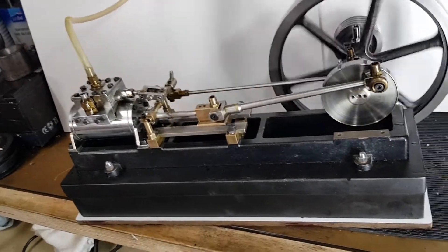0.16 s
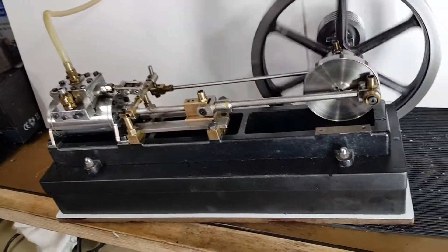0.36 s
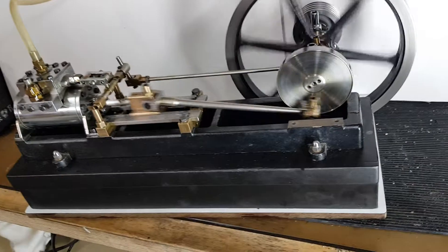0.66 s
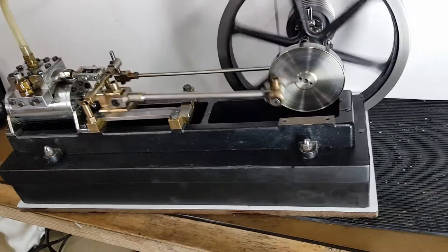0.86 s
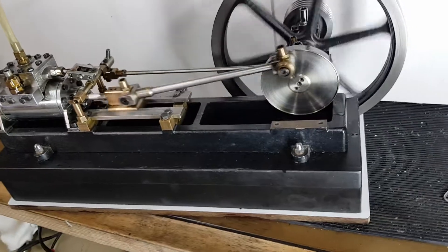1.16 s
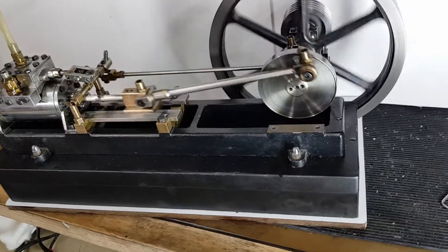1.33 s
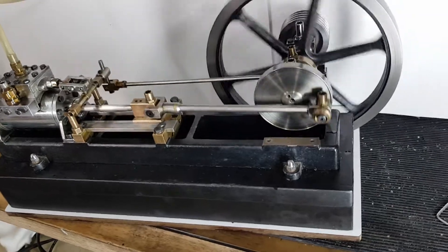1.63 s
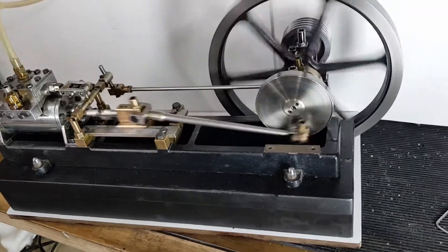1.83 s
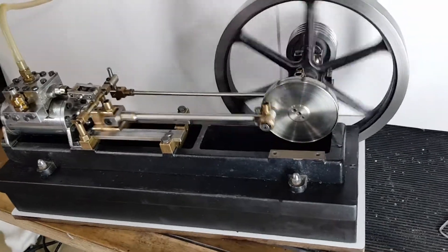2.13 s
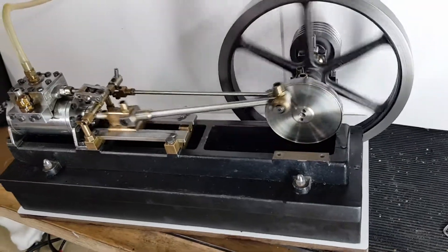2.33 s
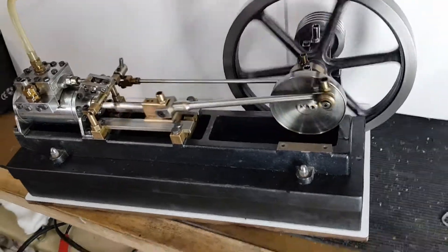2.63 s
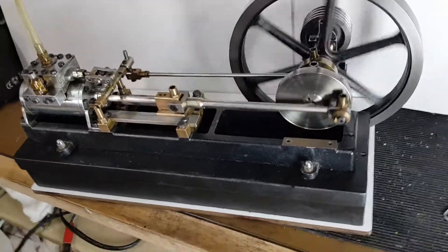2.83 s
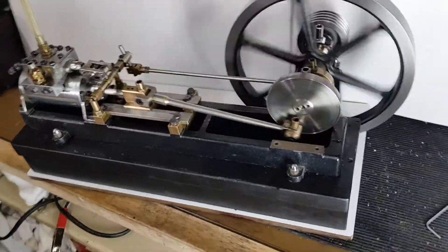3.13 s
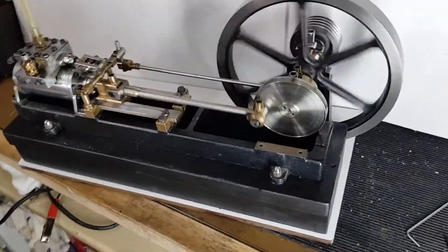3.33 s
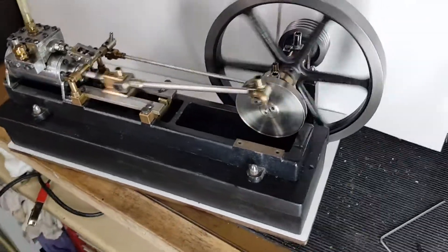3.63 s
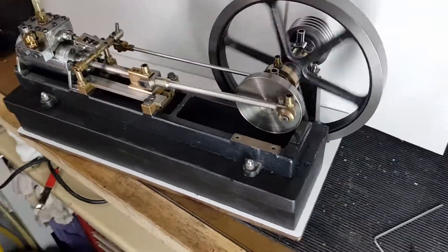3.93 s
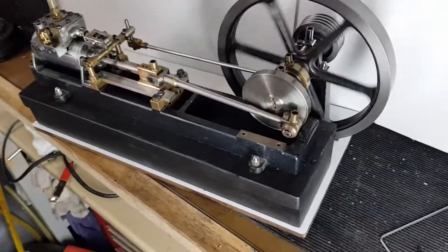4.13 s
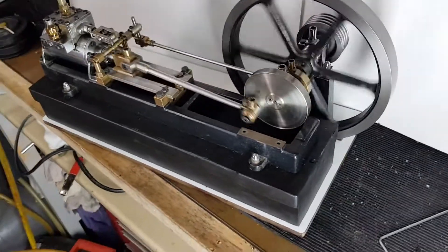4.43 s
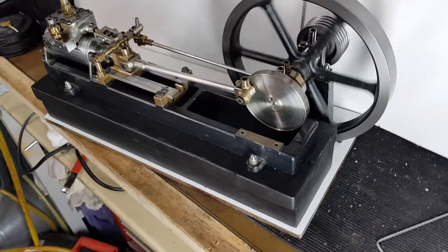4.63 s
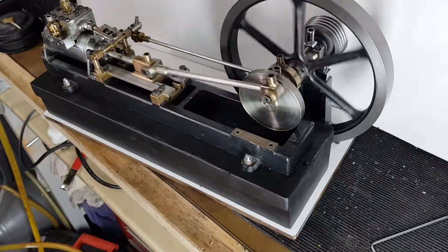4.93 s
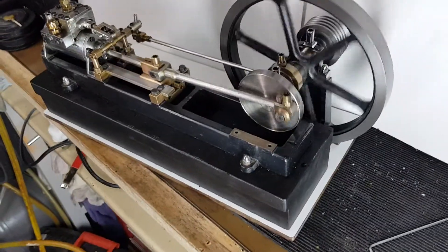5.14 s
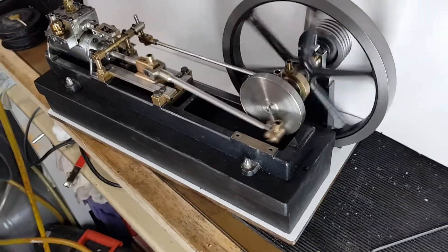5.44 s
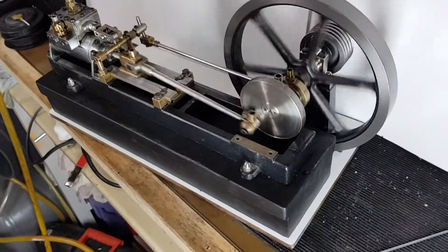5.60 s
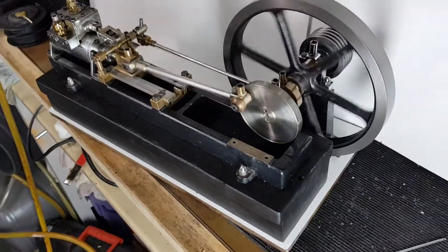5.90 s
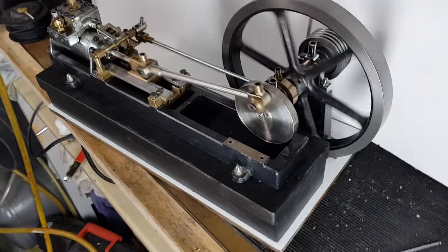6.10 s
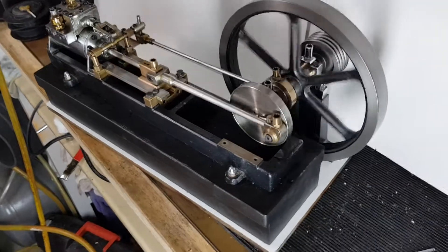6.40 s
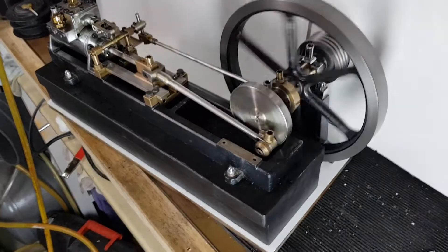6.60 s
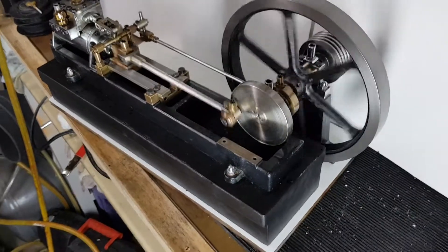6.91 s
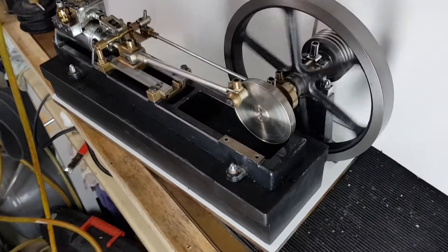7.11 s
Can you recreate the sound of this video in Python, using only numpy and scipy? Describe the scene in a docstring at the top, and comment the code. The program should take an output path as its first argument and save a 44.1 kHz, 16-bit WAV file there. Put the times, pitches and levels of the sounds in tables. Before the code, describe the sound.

Close bright air hiss swells over a slow, regular knocking of a little piston engine, with loud finger bumps on the right side of the microphone.

```python
"""On a wooden bench a model steam engine turns slowly, close to a hand-held microphone that moves round it.
Its valve chest leaks with a steady hiss, made of coloured noise that swells with every stroke.
On each stroke the valve spits, the piston whirrs (both narrow noise) and the rod knocks (falling sweeps and
ringing tones). A finger on the right microphone port adds noisy rubs, and pressure steps heard as pops and
thumps. Behind this the flywheel rumbles, the bench drones, and one soft scuff is heard on both sides."""
import sys
import numpy as np
from scipy import signal
from scipy.fft import rfft, irfft, next_fast_len
from scipy.io import wavfile

SR = 44100
rng = np.random.default_rng(int(sys.argv[2]) if len(sys.argv) > 2 else 0)


def master(y):
    """Save y as 16-bit WAV."""
    cut = np.clip(np.atleast_2d(y).T, -1, 1)
    pcm = np.round(cut * 32767)  # scale
    wavfile.write(sys.argv[1], SR, pcm.astype(np.int16))


N = 320166
TIME = np.arange(N) / SR  # seconds

# Colours of the three parts of the leak. Each row: frequency in Hz, level per hertz in dB.
JET_COLOUR = [(8500, -28), (10000, -8.5), (11000, -4), (12000, 1), (12900, 3), (14000, -6), (14500, 4),
              (15100, -8.5), (15700, -1.5)]
WHISTLE_COLOUR = [(1200, -31.5), (2700, -24.5), (3700, -18.5), (4300, -11), (5200, -6.5), (5600, -1),
                  (6100, -3.5), (6500, -4), (7000, -9.5), (8000, -24)]
SPRAY_COLOUR = [(5500, -41), (6700, -3.5), (7250, 5), (7700, -0.5), (8300, 2.5), (8750, 1), (9200, -1.5),
                (9800, -6), (11500, -25)]
# Mix of each part of the leak. In order: level in dB, share of the nearness swing (1 is all of it),
# swell within a stroke in dB, loss at a fully covered port in dB.
JET_MIX = (-43, 0.9, 5.5, 7)
WHISTLE_MIX = (-47.5, 0.86, 1.3, 6)
SPRAY_MIX = (-53, 0.9, 4.5, 18.5)
# Narrow resonances of the leaking gap. Each row: frequency in Hz, width in Hz, level in dB.
GAP_MODES = [(5690, 44, -13), (5880, 39, -14), (6008, 66, -7), (6090, 58, -16)]
# How strongly the gap's resonances are heard. Each row: time in seconds, level in dB.
GAP_RING = [(0, 3.5), (1, -0.5), (3.4, -2.5), (3.9, 5), (5.7, 1), (6.3, -7.5), (7.26, -10)]
# Balance of the whistle, which is beamed, so it shifts as the microphone moves.
# Each row: time in seconds, left minus right in dB.
WHISTLE_PAN = [(0, 3), (.85, -0.5), (4.3, 1), (4.65, 4.5), (5.5, 3), (6.35, -2.5), (7.26, 1)]
# How near the microphone is to the cylinder; leak, spits, whirr and drone follow it.
# Each row: time in seconds, level in dB.
NEARNESS = [(0, .5), (.65, -1.5), (1, -6.5), (2.9, -6), (3.2, -2.5), (3.8, 1), (5.35, -1), (5.7, .5),
            (6.15, 0), (6.3, -5.5), (7.26, -5.5)]
# Rod knocks at dead centre (either end of the stroke), outer and inner end in turn.
# Each row: start in seconds, level in dB.
KNOCKS = [(0.486, -44), (1.035, -47), (1.701, -53.5), (2.256, -46.5), (2.935, -50.5), (3.486, -40),
          (4.126, -40.5), (4.672, -41.5), (5.333, -45.5), (5.899, -45), (6.552, -47.5), (7.078, -47)]
# What a knock sets ringing in bed plate and bench; pitch and level vary a little from knock to knock.
# Each row: typical frequency in Hz, typical level in dB, time to fall by 60 dB in seconds.
KNOCK_MODES = [(63.3, -12.5, 0.12), (149, -5, 0.17), (248, -26, 0.069), (519.6, -7.5, 0.11),
               (697, -21, 0.071), (1310, -38, 0.099), (1653, -17, .06)]
# Grip of the hand beside the right port.
# Each row: time in seconds, share of the port covered from 0 to 1, rumble level in dB.
GRIP = [(0, 0.74, -44), (.6, 0.9, -44), (.8, 0.55, -54.5), (1.35, 0.9, -50), (2.95, 0.84, -46.5),
        (3.3, 0.04, -58.5), (4.5, 0, -56.5), (5.55, .1, -72), (5.77, 0, -45), (5.85, 0.76, -43),
        (6.15, 0.55, -37), (6.3, 0, -69), (7.26, 0.04, -64)]
# Finger pressure steps on the right port. Each row: middle in seconds, level in dB, rise in ms.
THUMPS = [(0.6927, 5.5, 0.46), (0.7103, -2.5, 0.37), (1.293, -26, 0.87), (1.446, -27.5, 0.7),
          (1.499, -27, 0.52), (1.656, -28, 0.5), (1.987, -30.5, 0.49), (2.057, -30.5, 0.52),
          (3.696, -31.5, .5), (4.531, -27, 0.65), (5.665, -13, 0.62), (5.67, -14.5, 0.36),
          (5.715, -11.5, 0.56), (5.72, -8.5, 0.62), (5.774, -5, 0.4), (5.817, -6, 0.87), (6.1782, 7.5, 1.1),
          (6.19, -1.5, 1.05), (6.239, -16.5, 1.5)]
# Finger rubs. Each row: middle in seconds, half-length in seconds, level in dB, treble slope in dB per octave.
RUBS = [(0.631, .0006, -19.5, 3.5), (0.649, 0.023, -38, 2), (0.683, 0.0085, -27.5, -4.5),
        (0.725, 0.043, -46.5, -5), (2.127, 0.02, -48, -6), (2.252, 0.02, -40.5, -4),
        (2.536, 0.023, -49, -3.5), (2.694, 0.026, -54.5, -4), (4.12, .014, -45.5, 0),
        (5.748, 0.035, -35, -1.5), (5.783, .017, -22.5, -3.5), (5.808, .009, -20.5, -4),
        (6.185, .016, -34, -1.5), (6.241, 0.0061, -38.5, -5.5), (6.365, 0.00092, -34, -5.5)]
# Colour of rubbing skin. Each row: frequency in Hz, level per hertz in dB.
SKIN_COLOUR = [(60, -13), (200, -0.5), (600, -3.5), (1600, -3), (3000, -6), (5000, -10.5), (7000, -18.5),
               (10000, -35)]
# Colour of the rolling rumble. Each row: frequency in Hz, level per hertz in dB.
ROLL_COLOUR = [(30, 8), (100, 4.5), (240, -1.5), (330, -3), (500, -14.5), (800, -19), (1500, -25),
               (3000, -22), (5000, -12.5)]
# Loudness of the rolling of shaft and flywheel. Each row: time in seconds, level in dB.
ROLLING = [(0, -66), (.45, -54.5), (1, -68.5), (2.7, -62.5), (4.2, -59), (5.15, -66), (5.9, -53),
           (6.4, -66), (7.26, -65.5)]
# Resonances at which the bench drones along. Each row: frequency in Hz, width in Hz, level in dB.
BENCH_MODES = [(60, 9, -58), (196.5, 5.5, -66)]

FLOW_SKEW = 0.79   # below 1, the air flow peaks before mid-stroke
JET_PAN_DB, SPRAY_PAN_DB = -3, -5   # left minus right
# these pairs hold the outer end of the stroke, then the inner end
CLACK_DB, TICK_DB = (-26, -4.5), (-11.5, -7.5)   # clack and metal tick, against the thud
SPIT_LEAD_S = (.053, .030)   # the valve opens this long before dead centre
SPIT_DB = (-44, -48.5)
WHIRR_DELAY_S = (0.18, 0.14)   # the whirr is at its height this long after dead centre
WHIRR_HZ, WHIRR_DB = (1375, 1302), (-64, -65.5)
# the whirr crosses from right to left as the microphone moves round
WHIRR_CENTRED_S, WHIRR_PAN_DB_PER_S = 4.1, 2.5
# the skin slips at every pressure step, the more the harder the step:
# level at a 0 dB step, dB per dB of step, half-length, treble slope per octave
SLIP_DB, SLIP_GROWTH, SLIP_HALF_S, SLIP_SLOPE_DB = -32, 1.2, .008, -3.2
ROLL_SWING_DB = 1.5   # rolling is loudest once a turn, at the outer dead centre
CUTOFF_HZ = 15800


def leak(flutter_db=1.0):
    """Hiss swells with the flow of each stroke; its gap rings near 6 kHz and the finger shades the right port."""
    near_db, cover = in_time(NEARNESS)[0], in_time(GRIP)[0]
    flow = np.sin(np.pi * (strokes() % 1) ** FLOW_SKEW)
    padded = next_fast_len(N)
    source = rfft(reflected_noise(), padded)
    f = np.fft.rfftfreq(padded, 1 / SR) + 1   # 1 Hz up, so the logarithm is defined

    def part(points):
        return rms_one(irfft(source * colour(points)(f), padded)[:, :N])

    def gain(pan_db, db, follows, stroke_db, shade_db):
        shade = np.outer([0, 1], shade_db * cover)
        level_db = db + follows * near_db + stroke_db * (flow - flow.mean())
        return panned(pan_db) * from_db(level_db - shade)

    jet = gain(JET_PAN_DB, *JET_MIX) * part(JET_COLOUR)
    spray = gain(SPRAY_PAN_DB, *SPRAY_MIX) * part(SPRAY_COLOUR)
    gap = sum(from_db(db) * noise(resonance(hz, width)) for hz, width, db in GAP_MODES)
    gap = from_db(in_time(GAP_RING)[0]) * gap
    whistle = gain(in_time(WHISTLE_PAN)[0], *WHISTLE_MIX) * (part(WHISTLE_COLOUR) + gap)
    return (jet + spray + whistle) * from_db(flutter_db * drift(45))


def reflected_noise(echo=0.81, sway_s=.00004, count=7):
    """One turbulent source reaches each port directly and off nearby metal; the paths change as the hand moves."""
    # finely sampled, so that a path can lengthen by less than one sample
    fine = signal.resample_poly(rng.standard_normal(N + SR // 20), 8, 1)

    def heard(lag_s):
        return fine[np.round((TIME + .02 - lag_s) * SR * 8).astype(int)]

    ports = []
    for direct_s in (0, .00019):   # the right port hears it slightly later
        lags = np.geomspace(.0012, .007, count) * rng.uniform(.8, 1.2, count)
        reflections = sum(heard(lag + sway_s * drift(2)) for lag in lags)
        ports.append(heard(direct_s) + echo * reflections)
    return np.array(ports)


def knocks(top_hz=1650, spread_s=.0125, thud_hz=450, thud_octaves=0.64, boom_db=-7,
           ring_t60=0.2, ring_db=-4, modes_db=-1):
    """Bending waves run through the bench, treble ahead of bass, scatter at its edges and set its modes ringing."""
    out, t = np.zeros((2, N)), TIME[:SR // 3]
    clack = np.exp(-t / 0.0049)
    tick_colour = colour([(800, -4), (1600, 2), (3000, -10.0), (7000, -0.5), (15000, -38)])
    for k, (s, db) in enumerate(KNOCKS):
        clack_db, tick_db = CLACK_DB[k % 2], TICK_DB[k % 2]
        # a falling pitch that wavers at random
        hz = top_hz / (1 + t / spread_s) ** 2 * 2 ** (.5 * drift(500, size=len(t)))
        thud = np.exp(-(np.log2(hz / thud_hz) / thud_octaves) ** 2)
        boom = from_db(boom_db) * np.exp(-2 * np.log2(hz / 160) ** 2)
        blow = np.sin(2 * np.pi * np.cumsum(hz) / SR) * (thud + boom + from_db(clack_db) * clack)
        # scattering: fading noise, mostly alike on both sides
        echoes = rng.standard_normal((3, len(t))) * from_db(-60 * t / ring_t60)
        echoes = echoes[:2] + 0.95 * echoes[2]
        echoes /= np.sqrt(np.sum(echoes ** 2) / 2)
        ring = from_db(ring_db) * signal.fftconvolve(blow[None], echoes)[:, :len(t)]
        for mode_hz, mode_db, t60 in KNOCK_MODES:
            # each mode starts when the wave of its pitch arrives
            age = np.maximum(t - spread_s * (np.sqrt(top_hz / mode_hz) - 1), 0)
            height = from_db(modes_db + mode_db + rng.normal(0, 2)) * np.exp(-np.log(1000) * age / t60)
            ring = ring + height * np.sin(2 * np.pi * mode_hz * rng.normal(1, 0.019) * age)
        # the metal contact itself gives a bright tick
        tick = from_db(tick_db) * np.exp(-t / 0.03) * noise(tick_colour, size=len(t))
        add(out, s, from_db(db) * (blow + ring + tick))
    return out


def valve(hz=4220, width=220, half_s=.011, pan_db=3, follows=1.6):
    """The opening valve gives a short narrow spit of noise just ahead of each knock."""
    spits = np.zeros((2, N))
    for s, end, near_db in dead_centres():
        spit = puff(s - SPIT_LEAD_S[end], half_s, resonance(hz, width), grain_db=6.5)
        spits += from_db(SPIT_DB[end] + follows * near_db) * spit
    return panned(pan_db) * spits


def piston(width=70, half_s=0.1, glide_hz=70, rush_db=-5, follows=1.0):
    """Each stroke sounds one soft resonance that rises with piston speed, with a broad rush of exhaust above it."""
    out, bell, speed = np.zeros((2, N)), swell(half_s, 1.4), piston_speed()
    for s, end, near_db in dead_centres():
        start = s + WHIRR_DELAY_S[end] - len(bell) / 2 / SR
        bend_hz = glide_hz * (np.interp(start + TIME[:len(bell)], TIME, speed) - .8)
        tone = signal.hilbert(noise(resonance(WHIRR_HZ[end], width), size=len(bell)))
        tone = tone * np.exp(2j * np.pi * np.cumsum(bend_hz) / SR)   # shift the pitch by the bend
        rush = from_db(rush_db) * noise(resonance(1750, 1800), size=len(bell))
        pan_db = WHIRR_PAN_DB_PER_S * (s - WHIRR_CENTRED_S)
        gain = from_db(WHIRR_DB[end] + follows * near_db) * panned(pan_db)
        add(out, start, gain * bell * (tone.real + rush))
    return out


def strokes():
    """Strokes made so far: whole at each dead centre, odd at the outer end."""
    centres = np.array(KNOCKS)[:, 0]
    # one more dead centre before the first and after the last
    centres = np.r_[2 * centres[0] - centres[1], centres, 2 * centres[-1] - centres[-2]]
    return np.interp(TIME, centres, np.arange(len(centres)))


def piston_speed():
    """The piston stands still (0) at each dead centre and is fastest (1) in mid-stroke."""
    return np.abs(np.sin(np.pi * strokes()))


def dead_centres():
    """Each dead centre as (seconds, end: 0 outer or 1 inner, nearness in dB)."""
    return [(s, k % 2, np.interp(s, *np.transpose(NEARNESS))) for k, (s, _) in enumerate(KNOCKS)]


def finger(port_hz=54, pops_per_s=25, pop_db=-39, pop_rise_s=.0008, judders_per_s=150, judder_db=6,
           bleed_db=-44):
    """Pressure steps on the right port swing out through the bass roll-off; sliding skin adds grainy rubs."""
    cover, rumble_db = in_time(GRIP)
    sliding = np.zeros(N)
    for s, half_s, db, _ in RUBS:
        bell = swell(half_s)
        add(sliding, s - len(bell) / 2 / SR, from_db(db) * bell)
    # small random shifts of pressure, more forceful on a covered port
    pops = cover * from_db(pop_db) * (rng.random(N) < pops_per_s / SR)
    # sliding skin sticks and slips
    judders = sliding * from_db(judder_db) * (rng.random(N) < judders_per_s / SR)
    pop_bell = swell(pop_rise_s)
    pushes = (pops + judders) * rng.standard_normal(N)
    pushes = np.convolve(pushes, pop_bell / pop_bell.sum(), "same")
    for s, db, rise_ms in THUMPS:
        bell = swell(rise_ms / 1000)
        add(pushes, s - len(bell) / 2 / SR, from_db(db) * bell / bell.sum())
    # adding up the pushes gives the pressure
    roll_off = signal.butter(4, port_hz, "high", fs=SR, output="sos")
    thumps = signal.sosfilt(roll_off, np.cumsum(pushes))
    rumble_colour = colour([(25, -31), (55, 10), (90, 3.0), (150, -10), (300, -23.5), (600, -42.5)])
    rumble = from_db(rumble_db + 4.2 * drift(21.99)) * noise(rumble_colour)[0]
    slips = [(s, SLIP_HALF_S, SLIP_DB + SLIP_GROWTH * db, SLIP_SLOPE_DB) for s, db, _ in THUMPS]
    rubs = np.zeros((2, N))
    for s, half_s, db, slope_db in RUBS + slips:
        rub_colour = colour(SKIN_COLOUR, slope_db)
        rubs += from_db(db) * puff(s, half_s, rub_colour, grain_db=3.0, squareness=2.13)
    return np.array([from_db(bleed_db) * rubs[0], rubs[1] + thumps + rumble])


def scuff(db=-47):
    """One soft scuff, a short swell of grainy noise, is heard on both sides."""
    return from_db(db) * puff(2.957, 0.028, colour(SKIN_COLOUR, slope_db=2.0), grain_db=-1)


def flywheel(drone_follows=0.76):
    """Bearing rumble swells once a turn, and the bench drones along at its low resonances."""
    roll_db = in_time(ROLLING)[0] - ROLL_SWING_DB * np.cos(np.pi * strokes())
    roll = from_db(roll_db + 2.7 * drift(25)) * noise(colour(ROLL_COLOUR), alike=0.41)
    near_db = in_time(NEARNESS)[0]
    drone = sum(from_db(db) * noise(resonance(hz, width), alike=1.0) for hz, width, db in BENCH_MODES)
    return roll + from_db(drone_follows * (near_db - near_db.mean())) * drone


def from_db(db):
    """Decibels to gain."""
    return 10 ** (np.asarray(db) / 20)


def rms_one(x):
    """Scale to unit power."""
    return x / np.sqrt(np.mean(x ** 2) + 1e-20)


def in_time(rows):
    """Each column of a curve at every sample."""
    s, *columns = np.transpose(rows)
    return [np.interp(TIME, s, c) for c in columns]


def panned(balance_db):
    """Left and right gains of constant total power, for a balance of left minus right."""
    gains = from_db(np.array([balance_db, -balance_db]).reshape(2, -1) / 2)
    return gains / np.sqrt(np.mean(gains ** 2, axis=0))


def colour(points, slope_db=0):
    """Gain over frequency through (Hz, dB) points, tilted about 1 kHz and falling away outside them."""
    hz, db = np.transpose(points)
    octave = np.log2(hz)

    def gain(f):
        at = np.log2(f)
        outside = np.abs(at - np.clip(at, octave[0], octave[-1]))
        tilt_db = slope_db * (at - np.log2(1000))
        return from_db(np.interp(at, octave, db) + tilt_db - 30 * outside)
    return gain


def resonance(hz, width):
    """Gain over frequency of one resonance with steep skirts."""
    return lambda f: 1 / (1 + ((f * f - hz * hz) / (1.5 * f * width)) ** 2)


def noise(gain, alike=0, size=N):
    """Stereo noise of a given colour, its sides from unrelated (alike 0) to the same (1); rms 1."""
    padded = next_fast_len(size)
    mid, side = rng.standard_normal((2, padded))
    alike = np.clip(alike, -1, 1)
    white = np.sqrt(1 + alike) * mid + np.sqrt(1 - alike) * side * np.array([[1], [-1]])
    spectrum = rfft(white) * gain(np.fft.rfftfreq(padded, 1 / SR) + 1)
    return rms_one(irfft(spectrum, padded)[:, :size])


def drift(rate, size=N):
    """Smooth random wandering with a spread near 1, taking a new random value `rate` times a second."""
    knots = rng.standard_normal(int(size / SR * rate) + 3)
    return np.interp(np.arange(size) / SR * rate, np.arange(len(knots)), knots)


def swell(half_s, squareness=2):
    """A bell-shaped envelope, flatter and more abrupt as squareness grows."""
    reach = int(3 * half_s * SR) + 1
    return np.exp(-np.abs(np.arange(-reach, reach) / (half_s * SR)) ** squareness)


def add(out, s, sound):
    """Mix a sound in from time s on."""
    start = round(s * SR)
    first, last = max(start, 0), min(start + sound.shape[-1], N)
    out[..., first:last] += sound[..., first - start:last - start]


def puff(s, half_s, gain, grain_db=0, grain_rate=900, squareness=2):
    """A swell of coloured, grainy noise centred on time s."""
    out, bell = np.zeros((2, N)), swell(half_s, squareness)
    grain = rms_one(from_db(grain_db * drift(grain_rate, size=len(bell))))
    add(out, s - len(bell) / 2 / SR, bell * grain * noise(gain, size=len(bell)))
    return out


def scene():
    """The engine and the hand that holds the microphone."""
    return leak() + knocks() + valve() + piston() + finger() + scuff() + flywheel()


def record(dry):
    """Peaks stop at full scale, then the top is cut steeply."""
    low_pass = signal.ellip(12, .1, 80, CUTOFF_HZ, fs=SR, output="sos")
    return signal.sosfilt(low_pass, np.clip(dry, -1, 1))


dry = scene()
out = record(dry)
master(out)
```